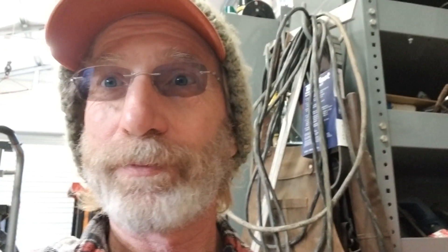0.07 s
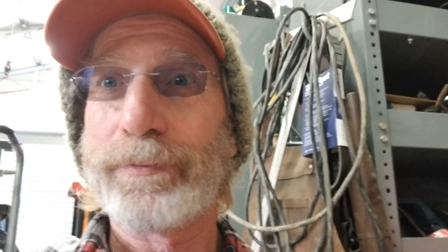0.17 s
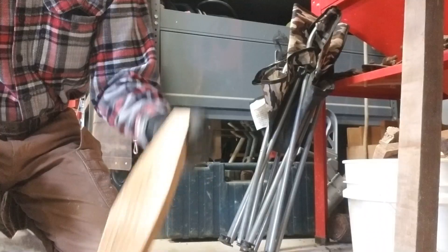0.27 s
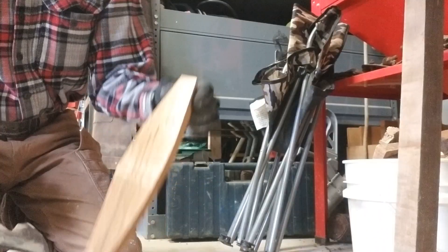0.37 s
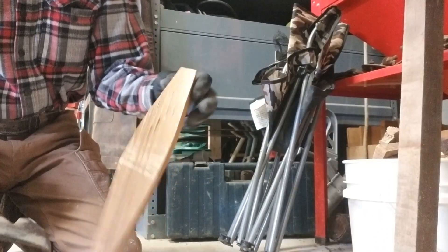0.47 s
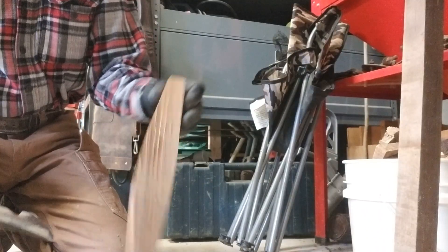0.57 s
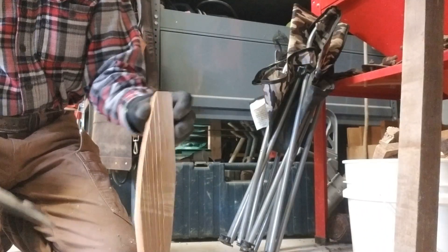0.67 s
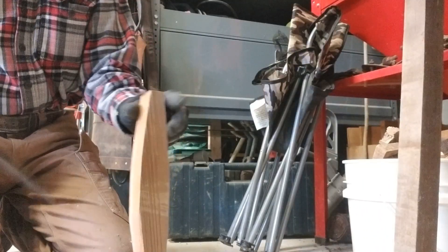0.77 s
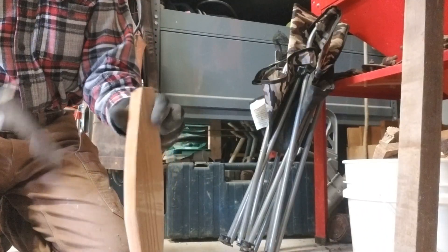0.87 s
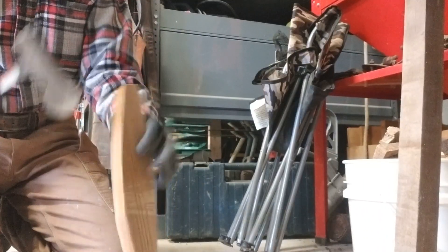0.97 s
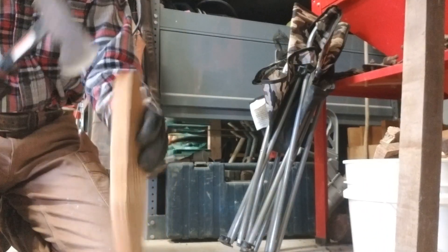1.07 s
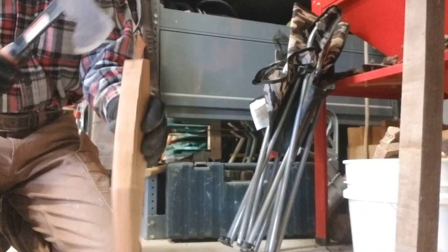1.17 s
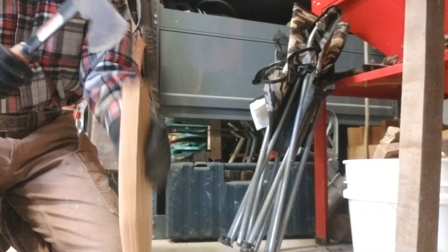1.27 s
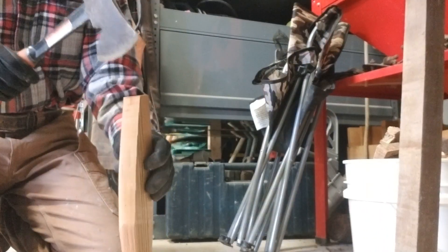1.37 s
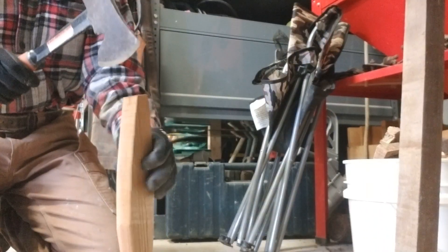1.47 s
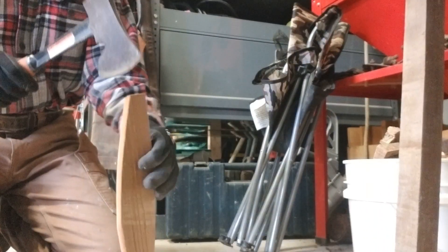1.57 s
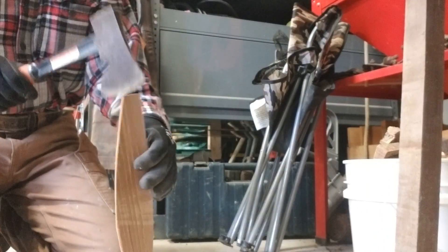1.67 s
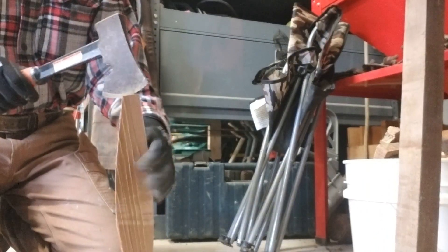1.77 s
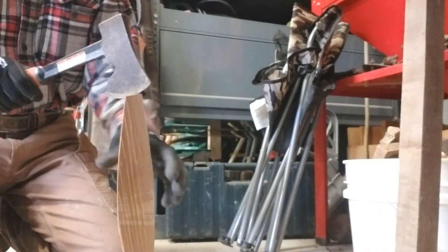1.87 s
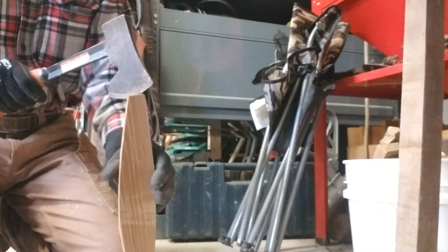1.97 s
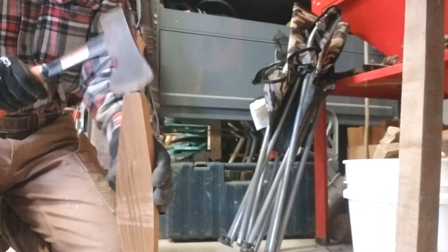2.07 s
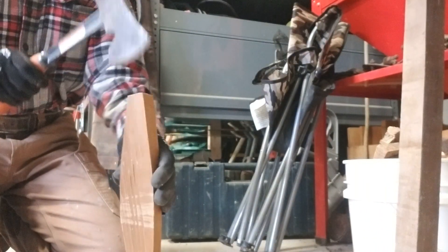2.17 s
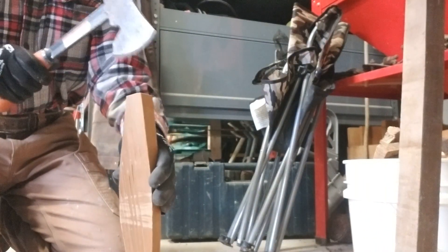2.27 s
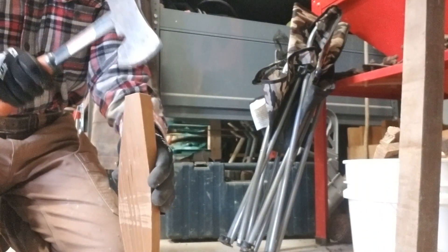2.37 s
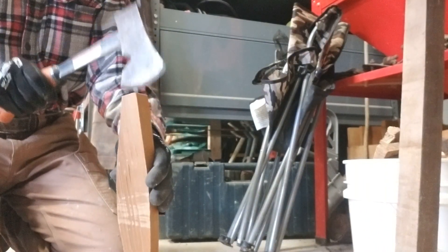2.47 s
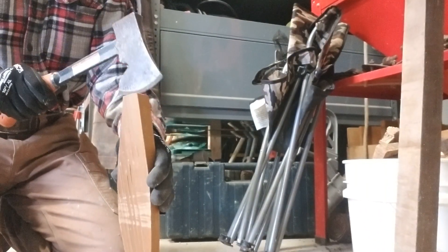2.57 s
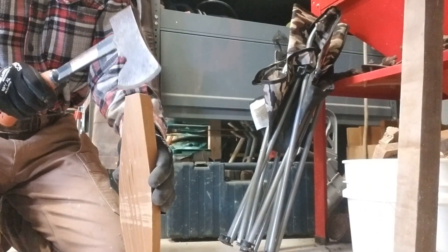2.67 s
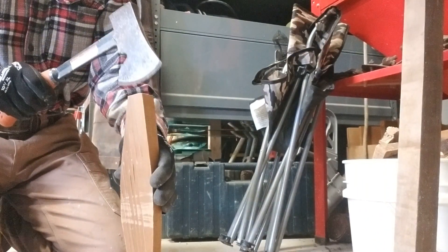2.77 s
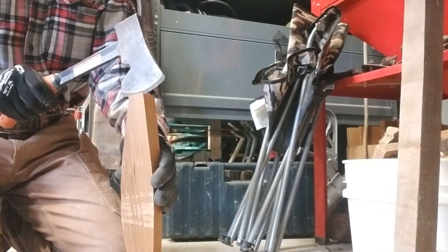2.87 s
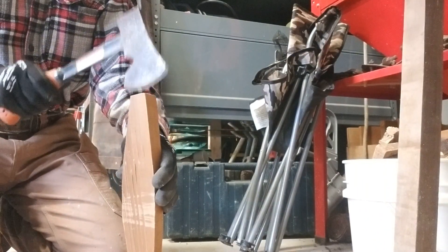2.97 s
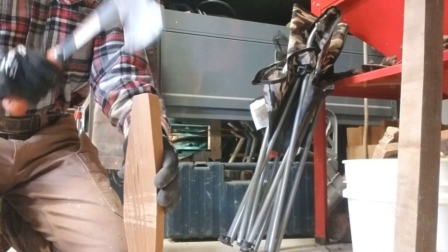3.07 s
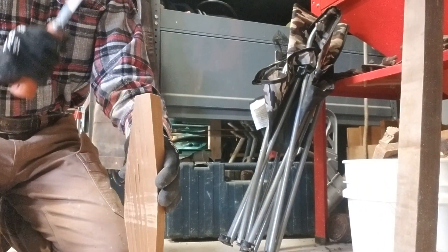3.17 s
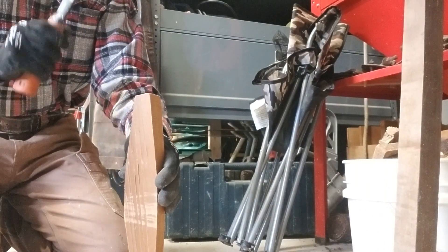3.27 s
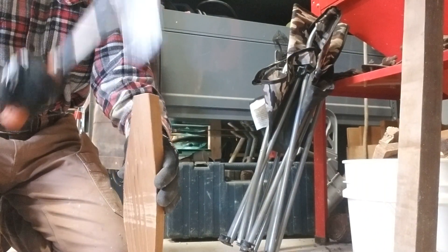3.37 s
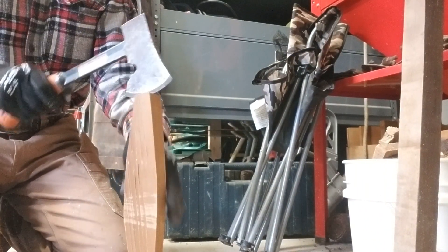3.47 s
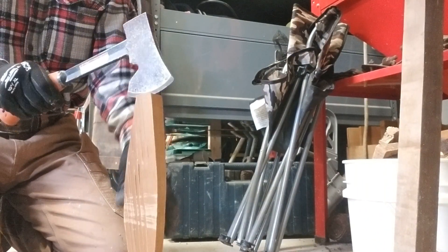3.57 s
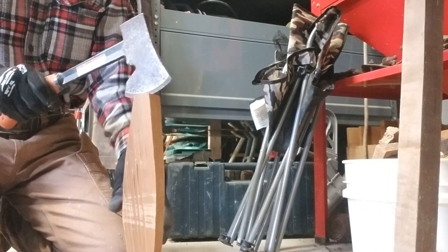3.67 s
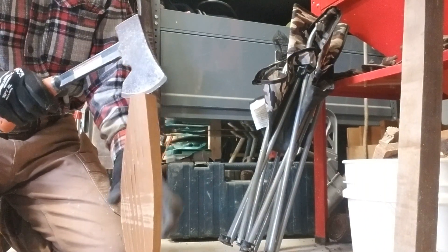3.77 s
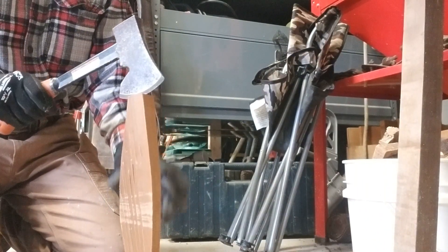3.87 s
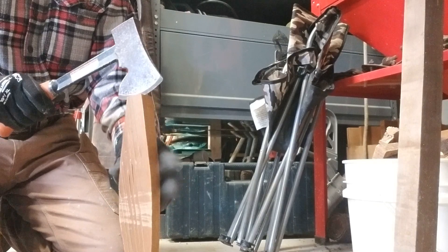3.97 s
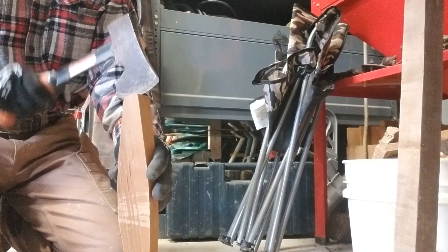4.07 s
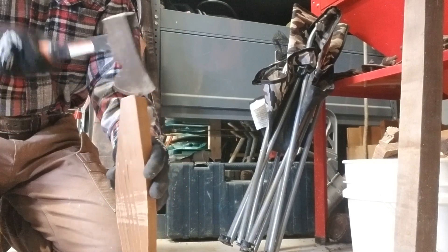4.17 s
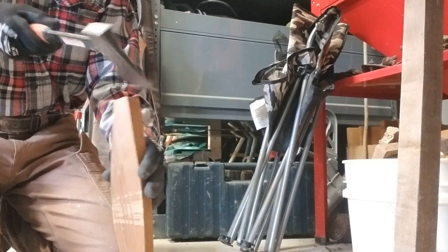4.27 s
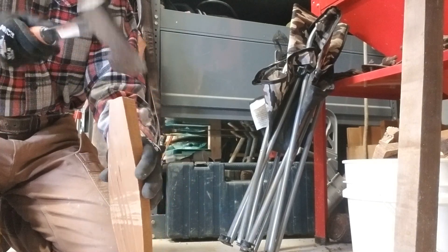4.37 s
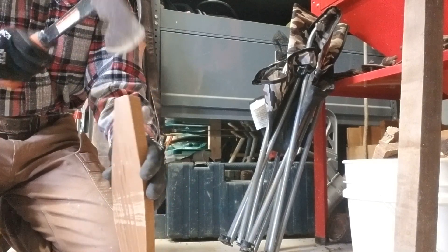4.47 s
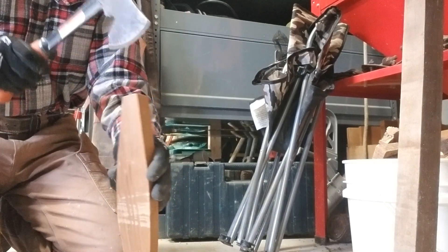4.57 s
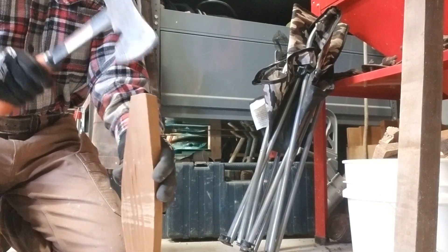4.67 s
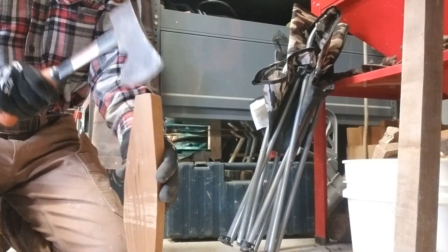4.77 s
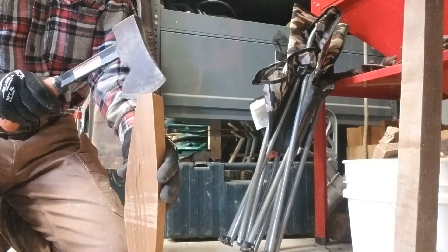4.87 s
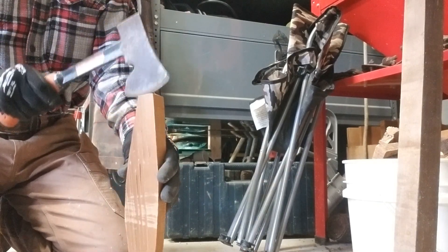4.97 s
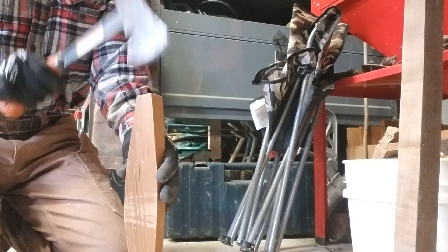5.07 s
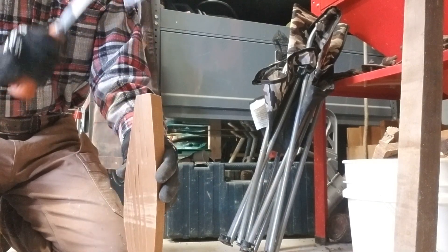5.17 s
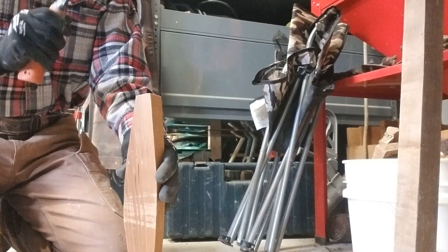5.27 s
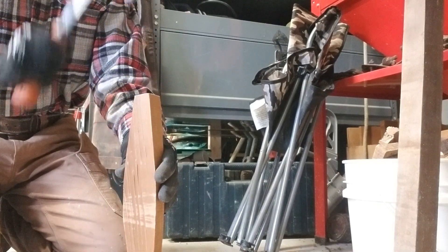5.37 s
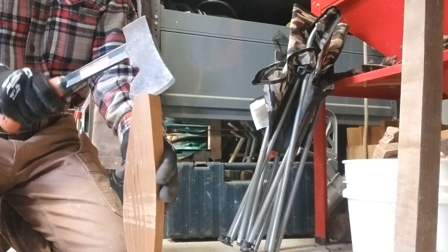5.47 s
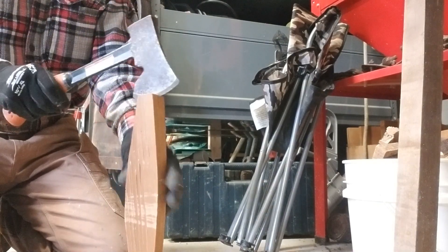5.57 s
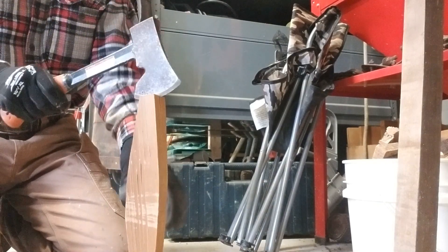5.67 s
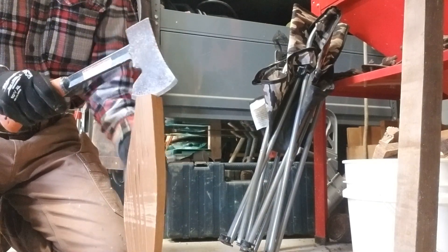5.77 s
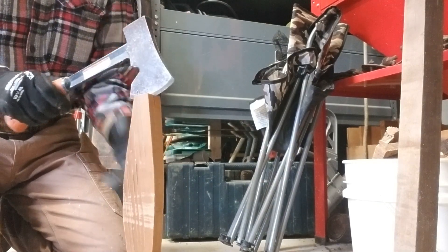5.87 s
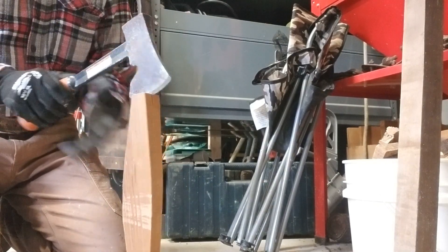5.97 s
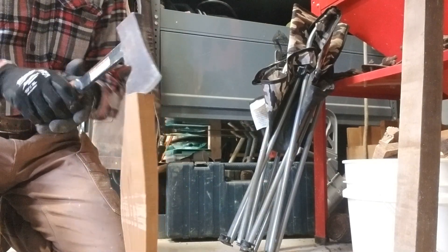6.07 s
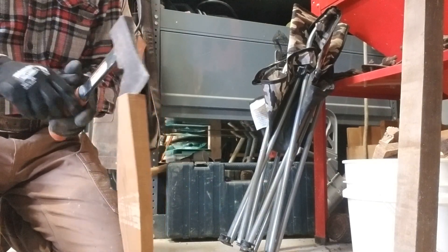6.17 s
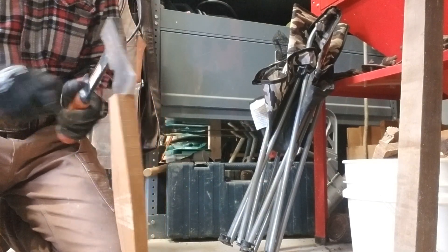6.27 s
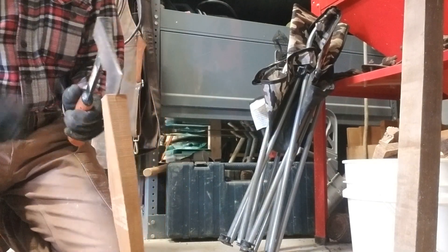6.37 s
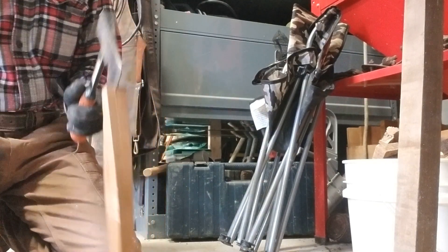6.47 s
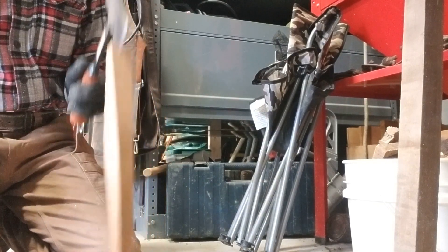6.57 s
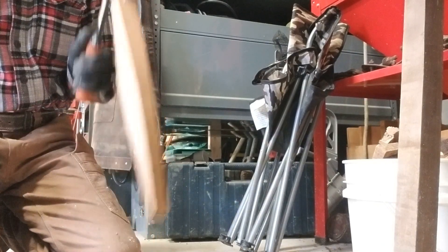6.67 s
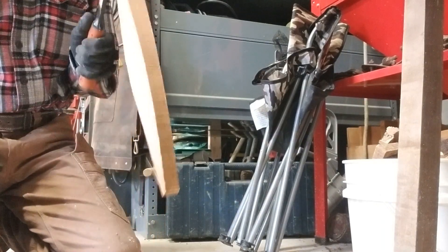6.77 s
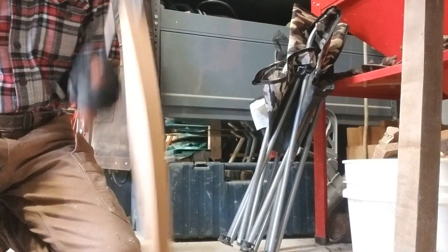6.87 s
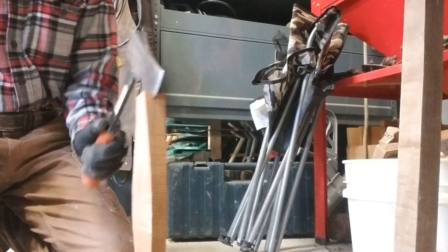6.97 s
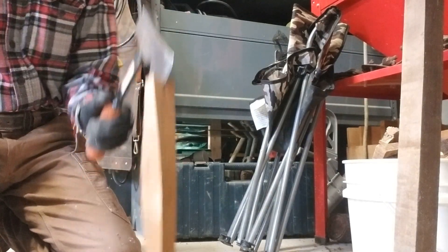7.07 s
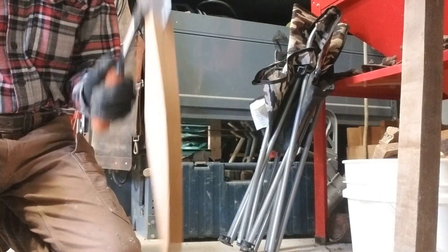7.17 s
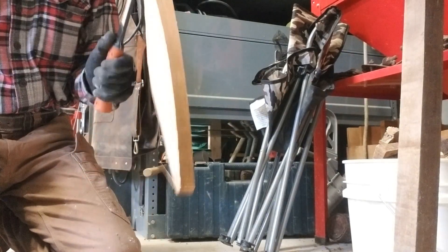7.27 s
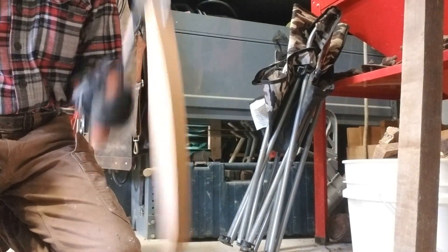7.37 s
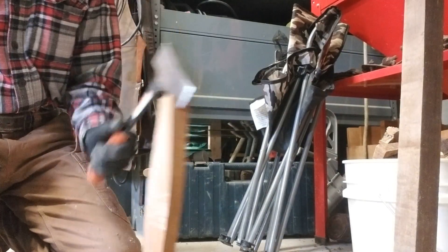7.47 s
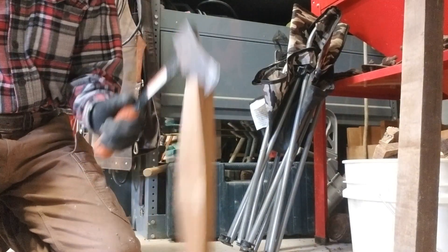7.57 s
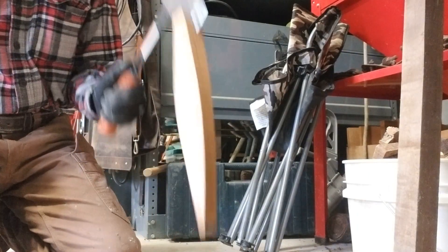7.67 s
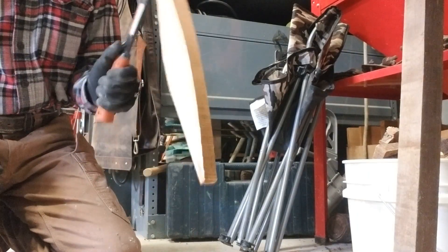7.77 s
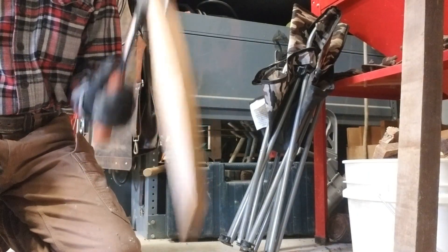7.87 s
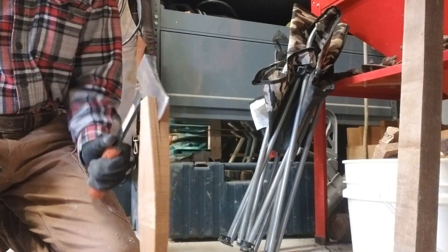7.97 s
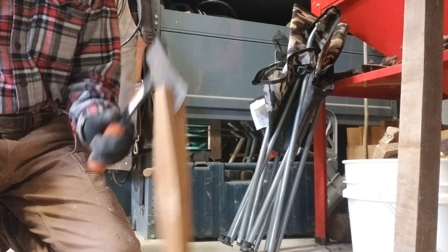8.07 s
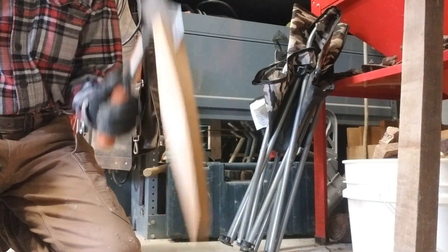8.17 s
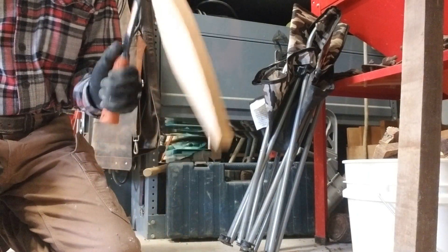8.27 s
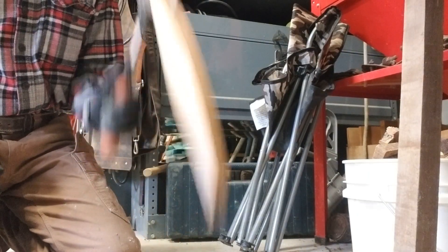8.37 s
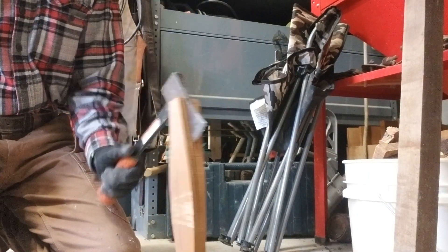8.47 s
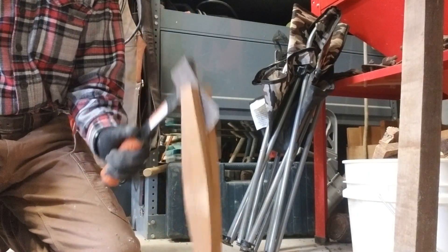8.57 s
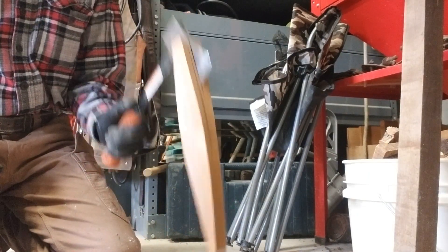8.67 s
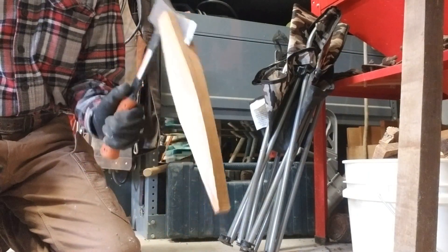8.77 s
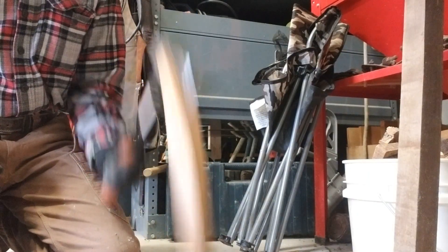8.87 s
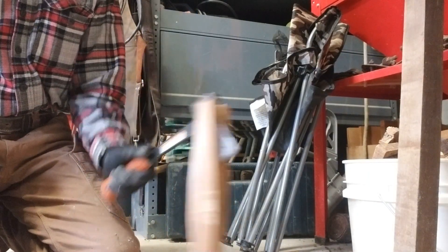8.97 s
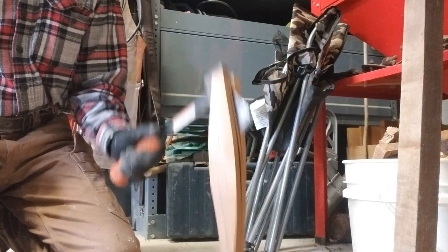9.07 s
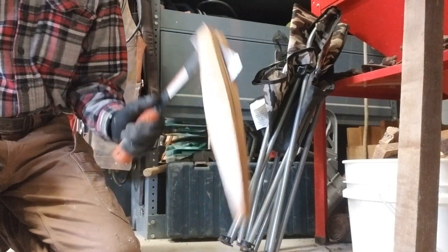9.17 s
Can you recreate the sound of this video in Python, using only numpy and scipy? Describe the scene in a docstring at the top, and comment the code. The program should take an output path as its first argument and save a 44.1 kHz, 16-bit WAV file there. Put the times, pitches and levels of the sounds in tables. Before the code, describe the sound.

Quiet workshop air with a faint low hum, close microphone. A sleeve rumbles and hisses past at 0-0.26 s, stopping abruptly. A board knocks lightly at 0.65, gloves rustle around 1.0, then a firm, crunchy wooden clunk at 1.3 and a duller tap with a steel tinge at 1.7. Soft scuffing follows; a faint tap at 2.5, a moderate knock at 2.85. A loud, hard chop cracks at 3.4 with low floor boom and room tail. Near-quiet, a solid knock at 4.86, then a second loud chop at 5.46. Gloves rustle and scrape with small ticks at 6.1-6.5. Five heavy slams land at 6.95, 7.45, 7.95, 8.45 and 8.9: bright woody cracks with a slight double hit, splintering, floor boom and short steel ring, the third and fourth crunchiest. Between the second and third, little wooden ticks and two tiny squeaks. The last slam rings most freely and decays.

```python
"""A hatchet splits a board on a workshop floor, close to the microphone: crackling contacts drive the modes
of board and blade, and the floor booms. The blade is set on the end grain and driven in by two chops; then
board and hatchet are swung down together five times, and the steel rings more freely as the crack opens.
Gloves, clothes and a sleeve are shaped noise, a slipping blade is a wavering tone; the room is decaying noise
in which steel shelving drones on. Behind it lie still air and a low hum."""
import sys
import numpy as np
from scipy import signal
from scipy.fft import rfft, irfft, next_fast_len
from scipy.io import wavfile

SR = 44100
rng = np.random.default_rng(int(sys.argv[2]) if len(sys.argv) > 2 else 0)


def inscribe(sig):
    """Save sig as 16-bit PCM at rate SR to the path in sys.argv[1].

    A 1-D sig is mono; a 2-D sig holds one channel per row.
    Samples are clipped to [-1, 1] before scaling.
    """
    pcm = np.round(np.clip(np.atleast_2d(sig).T, -1, 1) * 32767)
    wavfile.write(sys.argv[1], SR, pcm.astype(np.int16))


N = 407043
TIME = np.arange(N) / SR
CONTACT_SIZE = 2 ** 14  # samples in one contact

# All levels in the tables are relative ones.
# Blows on the board. Each row: start in seconds, body level in dB; then relative to the body, in dB: bass,
# knock, crack, splinter, floor boom, steel ring; then crushing fibres in dB against the first contact,
# delay of the second contact in seconds, its level in dB, send to the room in dB.
BLOWS = [(.649, 6.3, 0.5, 3, -6, -20, -17, -24, -5, 0.0025, -19, -9.5),
         (1.316, 17.2, -4.5, 5, -13, -27, -7.5, -2.5, 6, 0.0064, -3.5, -8.5),
         (1.7123, 12, 1, 4.5, -18, -36, 3, -25, -24.5, 0.0033, -37, -3),
         (2.530, 2.7, 2, -10.5, -30, -42.5, 6, -54, -18.5, 0.0026, -34, -2),
         (2.851, 17.1, -2.5, 4, -21, -35.5, 0.5, -37.5, -7, 0.0036, -28.5, -6),
         (3.402, 29.05, -5.5, 1.5, -14, -22, 1, -25.5, 0, .015, -3.5, -5),
         (4.857, 17.9, 1, -4, -33, -46, -9, -46.5, -13, 0.0038, -42.5, -10.5),
         (5.458, 29.4, -3, 3.5, -17.5, -21, -1.5, -30.5, -1, .0076, -12.5, -5),
         (6.9475, 24.97, -12, 4, -13.5, -11.5, -0.5, -36, 4, .019, 0, -2),
         (7.4539, 23.3, -8.5, 3.5, -10.5, -12, -3.5, -45.5, 6.5, .018, -3, 1),
         (7.9448, 24.26, -12.5, 1, -12, -8, -10, -4, 20.5, .016, -2.5, -2.5),
         (8.443, 22, -5.5, 1, -10.5, -8, -12, -3, 24.5, .013, -7.5, 1),
         (8.9066, 23.45, -7, -0.5, -7, -7.5, -15.5, -3.5, 2, .012, 2, -3)]
# Modes of the board. Each row: frequency in Hz, width in Hz with the blade free, level in dB standing on the
# floor, level in dB swung on the blade.
BOARD_MODES = [(267, 39, 2.5, -5), (317, 62, 0.5, -3.5), (364.4, 68, 7, -14), (437, 11, -0.5, -0.5),
               (502.5, 61, 4, -2.5), (609.7, 56, -4, 3.5), (715, 28, 2.5, 2), (845, 21, -5.5, 4),
               (923, 56, -5.5, -2), (1026.5, 44, 4.5, 4), (1177, 27, -1.5, -36.5), (1653, 55, -4, 8.5),
               (2060, 120, -3.5, 8), (2530, 360, 4, 4.5), (3210, 330, 0, 4), (4140, 100, -1, -21.5)]
# Modes of the hatchet head. Each row: frequency in Hz, width in Hz over which the gripping wood smears it,
# level in dB with the blade free, level in dB with the blade wedged, t60 in seconds.
STEEL_MODES = [(1094, 72, -2.5, -15.5, .3), (1830, 77, 5, -0.5, 0.21), (1947, 170, -3, 8.5, 0.11),
               (1904, 63, -20, -22, 0.61), (2300, 94, -3, -23, .22), (3460, 380, -1, 6, .09),
               (3660, 130, -23.5, -12.5, .17), (3827, 130, -14.5, -19, .1), (5450, 470, -25.5, -19, 0.3),
               (7020, 140, -24, -4, 0.16)]
# Modes of the floor. Each row: frequency in Hz, width in Hz, level in dB, t60 in seconds.
FLOOR_MODES = [(52, 15, -0.5, .47), (66.7, 20, -5, 2.1), (89, 16, -2, 1.1), (120, 32, -5, .9),
               (176.3, 70, -12, 1.6)]
# Small ticks of glove, handle and straining fibres. Each row: start in seconds, dull part in dB, bright part
# in dB, blade tink in dB.
TICKS = [(.261, -15, -26, -38), (.6495, 2, -14, -13), (1.04, -6.5, -21, -41.5), (2.059, -25.5, -24.5, -35),
         (4.861, -20, -23, -28.5), (6.261, -3.5, -21, -44.5), (6.314, -8, -24, -44.5),
         (6.35, -11, -21, -40.5), (6.425, -10.5, -19, -40), (7.62, 11, 0.5, -22.5), (7.672, -8, -4, -24.5),
         (7.688, -18.5, -6.5, -32.5), (7.7718, 5, -8, -14), (7.8481, 4, -17, -21.5),
         (7.8989, 3, -10, -14.5)]
# Colours of the two parts of a tick. Each row: frequency in Hz, level in dB.
TICK_DULL = [(60, -2), (250, -12.5), (700, 0), (1200, -4.5), (2500, -36.5), (16000, -61.5)]
TICK_BRIGHT = [(200, -20), (1200, 2), (2200, 2), (3000, -10), (3700, -10.5), (5000, -14), (9000, -15.5),
               (14000, -11.5)]
# Modes of the lightly touched blade. Each row: frequency in Hz, width in Hz, level in dB, t60 in seconds.
TINK_MODES = [(1130, 320, -1, 0.052), (2300, 420, 2, .05), (3720, 420, -4, 0.07), (5200, 280, -17, 0.056)]
# Squeaks of the blade slipping in the cleft. Each row: start in seconds, length in seconds, level in dB.
SLIPS = [(7.806, .048, -37.5), (7.896, .044, -41)]
# Wood and glove scuff as the grip changes, and the rubbed blade sings. Each row: peak in seconds, rise in
# seconds, fall in seconds, scuff in dB, singing in dB.
SCUFFS = [(1.76, .03, 0.37, -54, -70), (2.06, .2, 0.97, -62.5, -81.5), (6.265, 0.036, 0.05, -45, -80),
          (6.27, .35, 0.3, -50.5, -68), (6.48, .3, 0.14, -59.5, -67)]
# Colours of scuffing wood and singing blade. Each row: frequency in Hz, level in dB.
SCUFF_COLOUR = [(100, -1), (240, -2), (450, -4), (850, -2), (1100, -14.5), (1500, -26.5), (4000, -48)]
SINGING_COLOUR = [(1500, -41.5), (1800, -15), (1950, 5.5), (2150, -2.5), (2450, -23.5), (3300, -29),
                  (3900, -12.5), (6000, -34.5)]
# Rustles of cloth and gloves. Each row: peak in seconds, rise in seconds, fall in seconds, rubbing in dB,
# hiss in dB.
RUSTLES = [(.46, 0.11, 0.031, -71, -71.5), (.96, 0.13, 0.13, -59, -55.5), (1.028, 0.042, 0.024, -54, -59.5),
           (1.53, 0.098, 0.26, -62.5, -63.5), (1.66, .15, 0.075, -65, -66.5),
           (1.984, 0.072, .07, -66, -67.5), (2.06, 0.19, 0.1, -62, -58.5), (4.194, 0.058, .15, -81, -67),
           (6.128, 0.133, .35, -66, -58.5), (6.258, 0.027, .04, -50.5, -49), (6.41, .2, 0.097, -61, -71),
           (6.51, 0.054, 0.085, -72, -68)]
# Colours of rubbing cloth and hissing gloves. Each row: frequency in Hz, level in dB.
RUB_COLOUR = [(500, -3), (850, 7), (1400, 5), (2350, -3), (3000, -9), (3750, 11), (5100, -5), (7000, -37.5)]
GLOVE_HISS = [(2500, 10), (5000, 10), (8000, 13.5), (10500, 10), (13000, 21), (16000, -23)]
# A sleeve brushing past the microphone. Each row: peak in seconds, rise in seconds, fall in seconds, rumble
# in dB, hiss in dB.
BRUSHES = [(.13, 0.081, 0.054, -37, -40), (.192, 0.033, 0.036, -59, -49.5)]
# Colours of the sleeve at the microphone. Each row: frequency in Hz, level in dB.
RUMBLE_COLOUR = [(21, -54), (35, -33), (85, 2), (144, -13), (358, -11.5), (397, -12), (432, -18),
                 (696, -27), (805, -26.5), (1240, -33.5), (5000, -45.5), (6500, -62), (11000, -120)]
SLEEVE_HISS = [(1500, -14), (4000, -9), (6000, -11.5), (9000, -5.5), (11000, -5), (12500, 3), (15800, -2.5)]
# Colour of the still air in the workshop. Each row: frequency in Hz, level in dB.
AIR_COLOUR = [(21, -47), (35, -10.5), (82, 1.5), (129, -10.5), (176, -4), (222, -9.5), (309, -2.5),
              (490, -16), (650, -13.5), (739, -13.5), (907, -18.5), (1330, -31.5), (7420, -45.5),
              (12400, -33), (16000, -38.5)]
# The hum: level in dB of its tone, then of the octave above.
HUM_DB = [-64.5, -62.5]
# The room. Each row: frequency in Hz, t60 of the reverberation in seconds, level in dB and t60 in seconds of
# the drone of the steel shelving.
ROOM = [(60, 0.98, -8, 2.0), (172, 0.36, -9.5, 2.4), (327, 0.43, -12.5, 3), (680, 0.45, -4, 0.87),
        (1020, 0.47, -23, 0.96), (1860, 0.47, -29, 1.6), (3970, 0.27, -38, .8), (7600, 0.4, -45, .6),
        (15000, 0.21, -45, .5)]
# Microphone ports. Each row: frequency in Hz, left in dB, right in dB.
PORTS = [(100, 2, 4.5), (295, 0.5, -1), (550, -5, 0.5), (1280, -2.5, -1.5), (2180, 2, 0.5), (3494, -0.5, 4),
         (4800, -9.5, 0), (11100, -19.5, 2), (12730, -5.5, 5.5), (16200, -10.5, -1)]

# the swings wedge the blade ever deeper: from when, and how long until it sits fast
WEDGING_FROM_S, WEDGING_S = 6.59, 0.55
# top-octave snap above the splintering: edge biting the standing board, board swung on the blade
SNAP_STANDING_DB, SNAP_SWUNG_DB = 5, 0.8
SQUEAK_HZ, SLIP_ATTACK_S, SLIP_T60_S = 1020, .012, 0.062
SWELL_DB = 20  # the range that the rise and fall times of hand movements cover
# steady rumble and hiss at the opening, with the sleeve, which break off abruptly
RUMBLE_DB, RUMBLE_HISS_DB, RUMBLE_STOP_S, RUMBLE_RELEASE_S = -45, -61.5, .262, .008
HUM_HZ, AIR_DB = 88.5, -63.5
CUTOFF_HZ = 16000


def blows(wood_db=-4.0, steel_db=-7.0, boom_db=-25.0, boom_side_db=-13.5, second_dull_db=-18.0):
    """Each blow drives the wood, rings the steel and thumps the floor; returns near sound, room feed and boom."""
    near, feed, boom = np.zeros(N), np.zeros(N), np.zeros((2, N))
    for s, body, bass, knock, crack, splinter, floor, steel, crush, delay, second, room in BLOWS:
        wedged = np.clip((s - WEDGING_FROM_S) / WEDGING_S, 0, 1)
        snap = splinter + blend(SNAP_STANDING_DB, SNAP_SWUNG_DB, wedged)

        force = contact(crush)
        # the board's foot meets the floor a moment later, a duller contact
        foot = colour(contact(crush), [(1500, 0), (8000, second_dull_db)])
        add(force, from_db(second) * foot, delay)
        hardness = [(40, bass - 18), (130, bass - 7), (220, bass), (330, 0), (560, 0), (800, knock),
                    (1150, knock), (2600, crack), (5500, splinter), (9500, splinter), (12500, snap)]

        sound = from_db(body + steel + steel_db) * hatchet(wedged)
        wood = board(colour(force, hardness), wedged)
        add(sound, from_db(body + wood_db) * wood, 0)
        add(near, sound, s)
        add(feed, from_db(room) * sound, s)
        add(boom, from_db(body + floor + boom_db) * floor_thump(boom_side_db), s)
    return near, feed, boom


def contact(crush_db, crush_decay_s=0.062, bite_decay_s=0.024, bite_db=0.5, grain_db=4.0):
    """A push, the short bite of the edge, then the crackle of crushed fibres; energy 1."""
    push = colour(signal.unit_impulse(CONTACT_SIZE), [(1800, -1.5), (6000, -12)])
    bite = colour(crackle(bite_decay_s, grain_db), [(1000, -20), (4000, 2)])
    crushing = crackle(crush_decay_s, grain_db)
    return energy_one(push + from_db(bite_db) * bite + from_db(crush_db) * crushing)


def crackle(decay_s, grain_db):
    """A dying burst of uneven fibre snaps, flattened in spectrum to favour no pitch; energy 1."""
    t = np.arange(CONTACT_SIZE) / SR
    unevenness = from_db(grain_db * rng.standard_normal(CONTACT_SIZE))
    grains = rng.standard_normal(CONTACT_SIZE) * unevenness
    spectrum = rfft(grains * from_db(-60 * t / decay_s))
    flat = irfft(spectrum / (np.abs(spectrum) + 1e-12))
    return energy_one(flat * from_db(-10 * t / decay_s))  # flattening spreads the burst: damp it again


def board(force, wedged, dense_db=0.0, spread_db=0.5, detune=0.03, blade_damping=1.73):
    """Clear resonances stand out of a dense mass of damped ones; they shift a little from blow to blow."""
    out = from_db(dense_db) * force
    damping = blend(1, blade_damping, wedged)  # the wedged blade shortens every ring
    draws = rng.standard_normal((len(BOARD_MODES), 2))
    for (hz, width, standing_db, swung_db), (louder, higher) in zip(BOARD_MODES, draws):
        radius = np.exp(-np.pi * width * damping / SR)
        angle = 2 * np.pi * hz * (1 + detune * higher) / SR
        level_db = blend(standing_db, swung_db, wedged) + spread_db * louder
        gain = from_db(level_db) * (1 - radius ** 2) / 2
        poles = [1, -2 * radius * np.cos(angle), radius ** 2]
        out = out + signal.lfilter([gain, 0, -gain], poles, force)
    return out


def hatchet(wedged):
    """The steel head rings; the wedged board holds some of its modes and frees others."""
    modes = [(hz, width, blend(free_db, wedged_db, wedged), t60)
             for hz, width, free_db, wedged_db, t60 in STEEL_MODES]
    return ringing(modes, SR, spread_db=1.0)


def floor_thump(side_db):
    """The floor's low modes ring, with a weaker part of opposite sign on the two sides."""
    middle = ringing(FLOOR_MODES, 2 * SR, count=7)
    side = ringing(FLOOR_MODES, 2 * SR, count=1) * [[1], [-1]]
    return middle + from_db(side_db) * side


def ringing(modes, size, count=8, spread_db=2.5):
    """Struck modes, each a cluster of close partials that beat, drawn anew at every call; energy 1."""
    t, out = np.arange(size) / SR, 0
    for hz, width, db, t60 in modes:
        places = (np.arange(count) + rng.random(count)) / count - .5
        partials = hz + width * places
        weights = np.sin(np.pi * (np.arange(count) + .5) / count) ** 2  # strongest at the centre
        phases = rng.random((count, 1))
        cluster = weights @ np.sin(2 * np.pi * (partials[:, None] * t + phases))
        ring = energy_one(cluster * from_db(-60 * t / t60)) * np.sqrt(t60)  # longer rings hold more energy
        onset = 1 - np.exp(-t * hz)
        out = out + from_db(db + spread_db * rng.standard_normal()) * ring * onset
    return energy_one(out * np.minimum(1, 10 * (1 - t / t[-1])))  # fade over the last tenth


def blend(free, fast, wedged):
    """A value between that of the free blade (wedged = 0) and that of the blade stuck fast (wedged = 1)."""
    return free + (fast - free) * wedged


def ticks(crush_db=1.0):
    """Little knocks and fibre snaps are coloured contacts; the touched blade tinks on its modes."""
    out = np.zeros(N)
    for s, dull, bright, tink in TICKS:
        force = contact(crush_db)
        knock = from_db(dull) * colour(force, TICK_DULL)
        snap = from_db(bright) * colour(force, TICK_BRIGHT)
        add(out, knock + snap + from_db(tink) * ringing(TINK_MODES, CONTACT_SIZE), s)
    return out


def squeak():
    """Steel slipping in the cleft sings unevenly near the hatchet's lowest mode: attack, hold, release."""
    level = np.zeros(N)
    for s, length, db in SLIPS:
        attack = np.clip((TIME - s) / SLIP_ATTACK_S, 0, 1)
        release_db = -60 * np.clip((TIME - s - length) / SLIP_T60_S, 0, 2)
        level += from_db(db + release_db) * attack
    hz = SQUEAK_HZ * (1 + .008 * drift(250))
    judder = from_db(1.5 * drift(160))
    return level * judder * np.sin(2 * np.pi * np.cumsum(hz) / SR)


def regrip(judder_db=4.5):
    """Stick and slip: a dull scrape of wood and a faint ring of steel, both juddering noise."""
    scuff_gain, singing_gain = movements(SCUFFS)
    scuff = scuff_gain * noise(SCUFF_COLOUR, alike=0.27)
    singing = singing_gain * noise(SINGING_COLOUR, alike=0.12)
    return from_db(judder_db * drift(54)) * (scuff + singing)


def cloth(rub_db=-8.5, grain_db=2.5, left_db=-28.0):
    """Fabric catches and slips in uneven little bursts; the gloves hiss mostly on the right."""
    rub_gain, hiss_gain = movements(RUSTLES)
    gloves = hiss_gain * noise(GLOVE_HISS, alike=0.51) * from_db([[left_db], [0]])
    rubbing = from_db(rub_db) * rub_gain * noise(RUB_COLOUR, alike=0.1)
    return from_db(grain_db * drift(150)) * (gloves + rubbing)


def sleeve(grain_db=4.0):
    """A sleeve brushes close by over a steady rumble and hiss; the opening sound breaks off all at once."""
    steady = from_db([[RUMBLE_DB], [RUMBLE_HISS_DB]])
    rumble_gain, hiss_gain = np.hypot(movements(BRUSHES), steady)
    brush = hiss_gain * from_db(grain_db * drift(253)) * noise(SLEEVE_HISS, alike=0.12)
    rumble = rumble_gain * noise(RUMBLE_COLOUR, alike=0.43)
    sounding = np.clip(1 - (TIME - RUMBLE_STOP_S) / RUMBLE_RELEASE_S, 0, 1)
    return sounding * (brush + rumble)


def movements(rows):
    """Gains of the two sounds that a table of movements makes; overlapping movements add in power."""
    power = np.zeros((2, N))
    for peak_s, rise_s, fall_s, first_db, second_db in rows:
        power += (from_db([[first_db], [second_db]]) * swell(peak_s, rise_s, fall_s)) ** 2
    return np.sqrt(power)


def swell(peak_s, rise_s, fall_s):
    """Gain of one movement of the hands: it grows to 1, then dies away, both evenly in dB."""
    distance = np.maximum((peak_s - TIME) / rise_s, (TIME - peak_s) / fall_s)
    return from_db(-SWELL_DB * distance.clip(0, 10))


def workshop(x, build_s=0.00043, alike_hz=480, scatter_db=3.0):
    """Dense reflections that die band by band, then the long drone of the shelving."""
    size = 3 * SR
    t, f = np.arange(size) / SR, np.fft.rfftfreq(size, 1 / SR)
    scatter = from_db(scatter_db * rng.standard_normal(size))
    white = rfft(rng.standard_normal((3, size)) * scatter)
    alike = 1 / (1 + (f / alike_hz) ** 2)  # long waves reach both ports alike
    field = np.sqrt(alike) * white[2] + np.sqrt(1 - alike) * white[:2]
    field /= np.std(irfft(field))

    response, centres = 0, np.log([row[0] for row in ROOM])
    for share, (hz, t60, drone_db, drone_t60) in zip(np.eye(len(ROOM)), ROOM):
        band = irfft(field * np.interp(np.log(f + 1), centres, share))
        reverb = energy_one(from_db(-60 * t / t60) * (1 - np.exp(-t / build_s)))
        drone = from_db(drone_db) * energy_one(from_db(-60 * t / drone_t60))
        response = response + band * np.hypot(reverb, drone)
    return signal.fftconvolve(x[None], response, axes=1)[:, :N]


def background(waver_db=1.0):
    """Still workshop air is coloured noise; the low hum is a tone and its octave, wavering in level and phase."""
    hum = np.zeros(N)
    for k, db in enumerate(HUM_DB, 1):
        level = from_db(db + waver_db * drift(3.6))
        hum += level * np.sin(2 * np.pi * k * HUM_HZ * TIME + 0.99 * drift(10.0))
    return hum + from_db(AIR_DB) * noise(AIR_COLOUR, alike=0.29)


def noise(points, alike):
    """Coloured stereo noise of rms 1, partly shared by both sides."""
    white = rng.standard_normal((3, N))
    sides = np.sqrt(alike) * white[2] + np.sqrt(1 - alike) * white[:2]
    return rms_one(colour(sides, points))


def drift(rate):
    """Random wander of spread 1 between knots, at this many knots per second."""
    knots = rng.standard_normal(2048)
    return np.interp(TIME * rate, np.arange(len(knots)), knots)


def colour(x, points, axis=1):
    """Causal (minimum-phase) filter that follows a table of dB."""
    n = 2 * next_fast_len(x.shape[-1] // 2 + 512)
    cepstrum = irfft(np.log(from_db(at_hz(points, np.fft.rfftfreq(n, 1 / SR), axis))))
    cepstrum[1:n // 2] *= 2  # fold the cepstrum forward in time
    cepstrum[n // 2 + 1:] = 0
    return irfft(rfft(x, n) * np.exp(rfft(cepstrum)))[..., :x.shape[-1]]


def at_hz(points, hz, axis=1):
    """Reads one column of a table on a log-frequency axis."""
    points = np.array(points)
    return np.interp(np.log(np.maximum(hz, 1)), np.log(points[:, 0]), points[:, axis])


def add(out, x, s):
    """Mixes a sound in at a time in seconds."""
    i = max(round(s * SR), 0)
    out[..., i:i + x.shape[-1]] += x[..., :out.shape[-1] - i]


def from_db(db):
    """Amplitude gain of a level in dB."""
    return 10 ** (np.asarray(db) / 20)


def rms_one(x):
    """Scales a sound to rms 1."""
    return x / np.sqrt(np.mean(x ** 2) + 1e-20)


def energy_one(x):
    """Scales a sound to energy 1."""
    return x / np.sqrt(np.sum(x ** 2) + 1e-20)


def scene(direct_left_db=-7.0, direct_right_db=-2.0, room_db=0.0, small_room_db=-8.0):
    """The work is a little to the right: the left port hears it later and duller."""
    near, feed, boom = blows()
    small = ticks() + squeak()
    direct = near + small
    left, right = from_db(room_db) * workshop(feed + from_db(small_room_db) * small)
    left = left + from_db(direct_left_db) * np.roll(direct, 5)  # samples later
    right = right + from_db(direct_right_db) * direct
    work = np.array([colour(left, PORTS, axis=1), colour(right, PORTS, axis=2)])
    return work + boom + cloth() + sleeve() + regrip() + background()


def record(dry):
    """The highest peaks are rounded and the top is cut."""
    rounded = 1.1 * np.tanh(dry / 1.1)
    low_pass = signal.ellip(10, .3, 80, CUTOFF_HZ, fs=SR, output="sos")
    return signal.sosfilt(low_pass, rounded)


dry = scene()
out = record(dry)
inscribe(out)
```